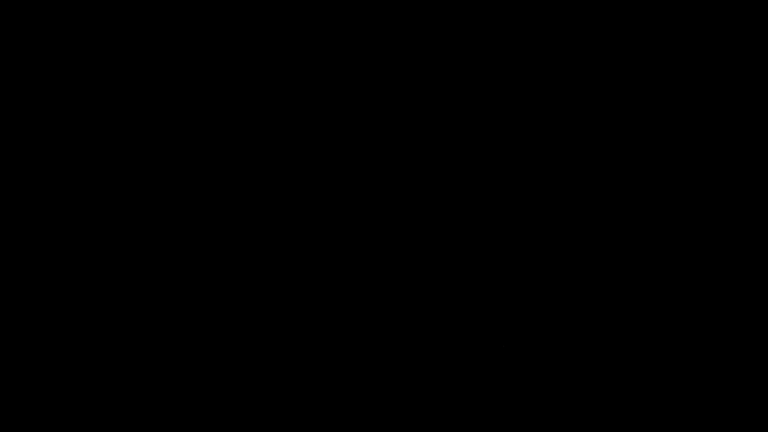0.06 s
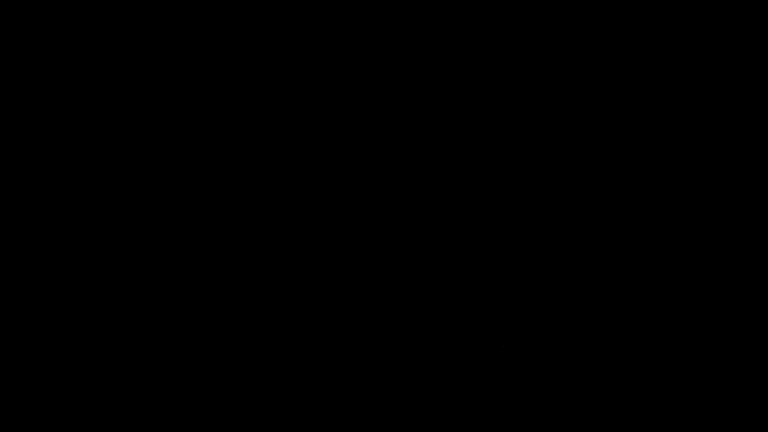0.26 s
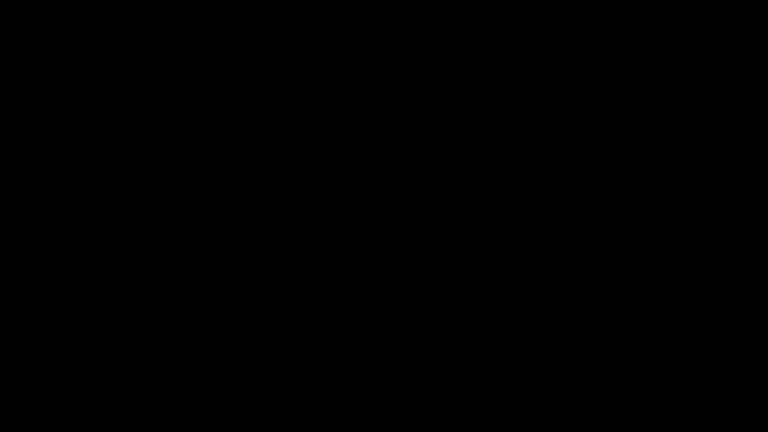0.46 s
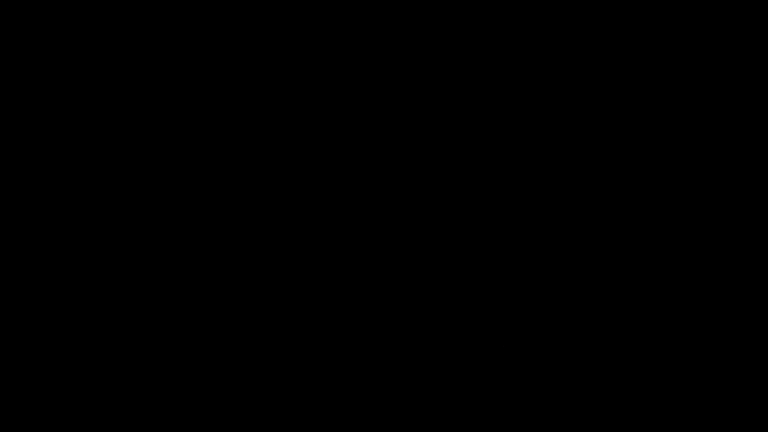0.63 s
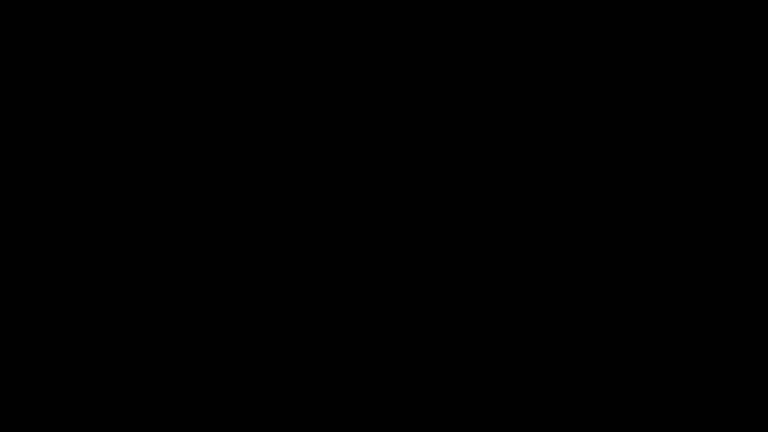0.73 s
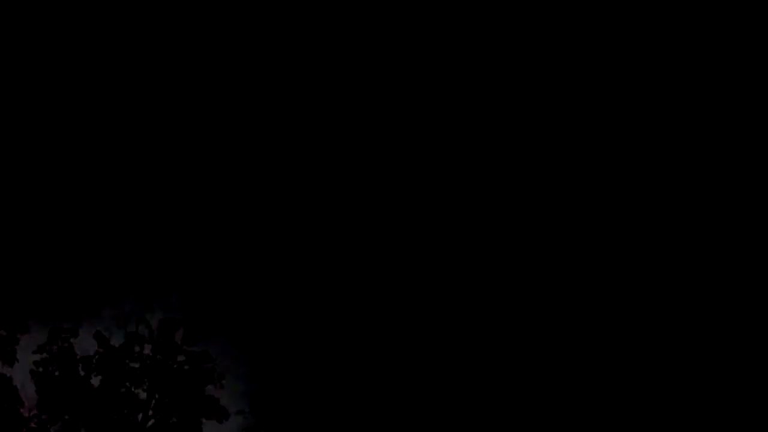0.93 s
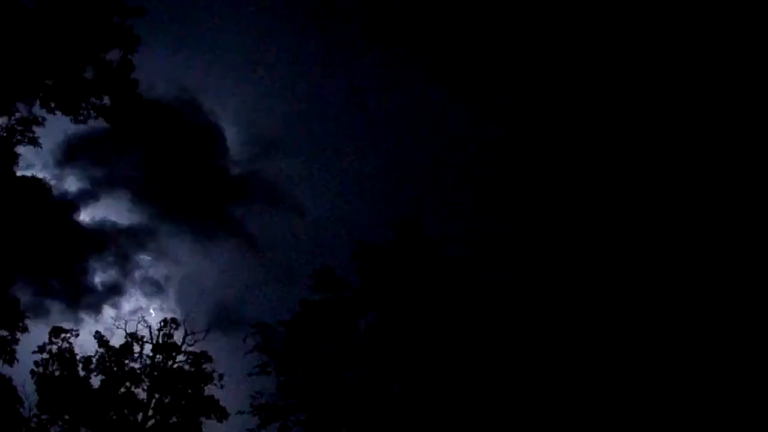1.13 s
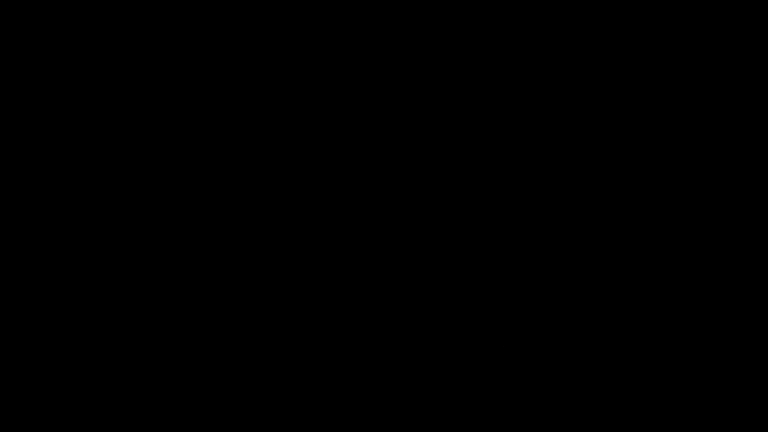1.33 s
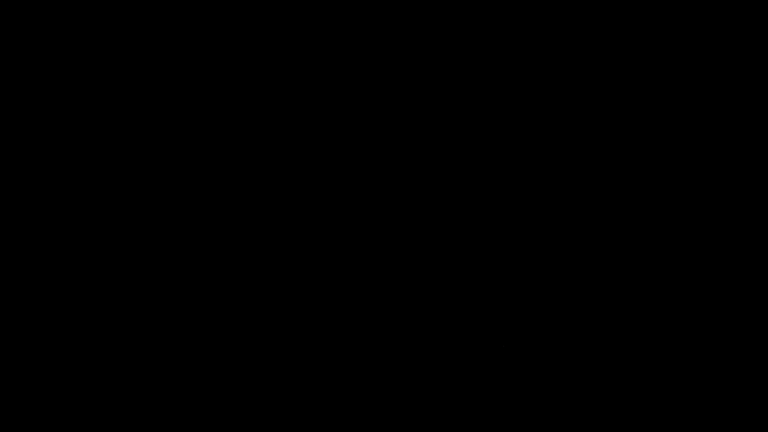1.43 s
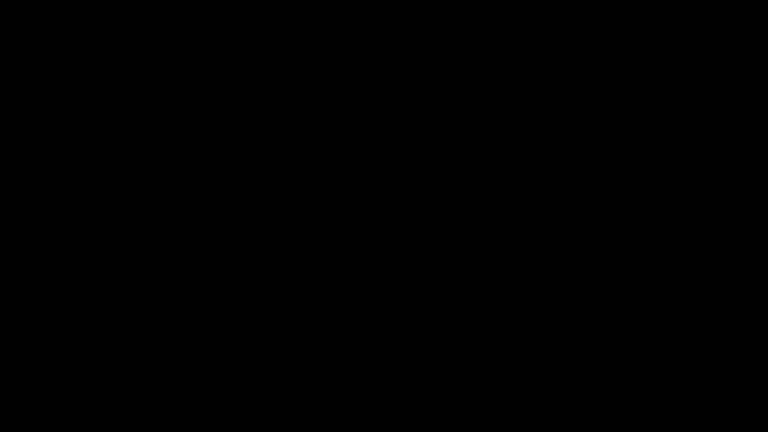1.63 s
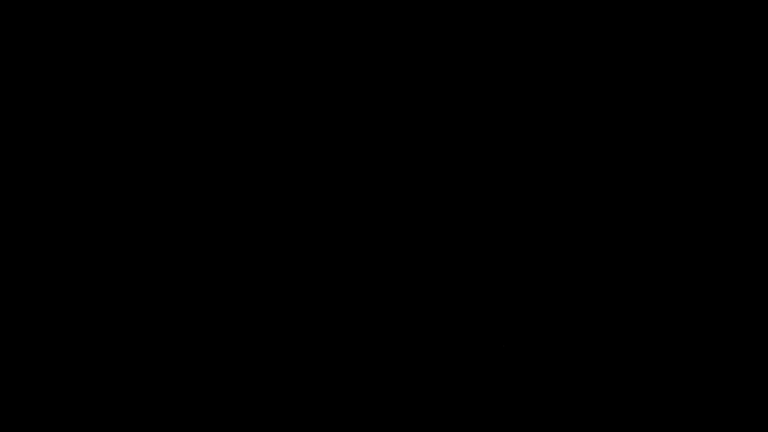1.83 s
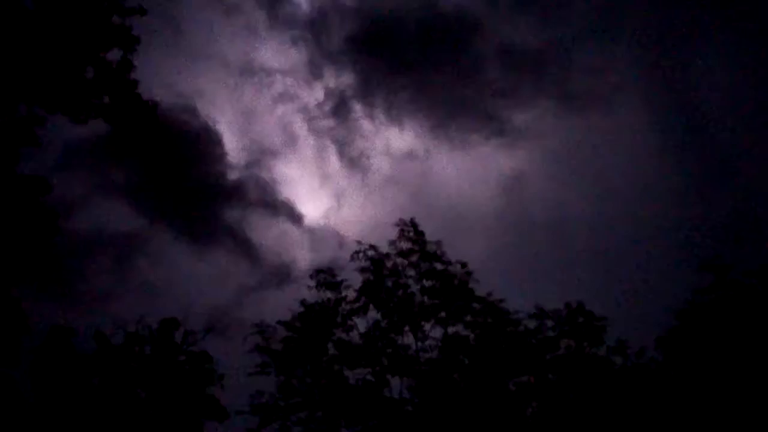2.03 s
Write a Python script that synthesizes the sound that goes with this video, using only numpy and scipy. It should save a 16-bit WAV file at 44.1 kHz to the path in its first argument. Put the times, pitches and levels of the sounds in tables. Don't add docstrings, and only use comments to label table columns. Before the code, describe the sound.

Low distant thunder rolls and swells twice, then fades under a fine hiss of rain

```python
import sys
import numpy as np
from scipy import signal
from scipy.fft import rfft, irfft
from scipy.io import wavfile

SR = 44100
rng = np.random.default_rng(int(sys.argv[2]) if len(sys.argv) > 2 else 0)


def gain_from_db(level_db):
    decades = np.asarray(level_db, float) / 20
    return 10 ** decades


def unload_audio(sound):
    columns = np.transpose(np.atleast_2d(sound))
    steps = np.round(np.clip(columns, -1, 1) * 32767)
    wavfile.write(sys.argv[1], SR, steps.astype(np.int16))


N = 91904


def rms_one(x):
    return x / np.sqrt(np.mean(x ** 2) + 1e-20)


def cut(x, hz, kind, order=2):
    return signal.sosfilt(signal.butter(order, hz, kind, fs=SR, output="sos"), x)


def drift(rate_hz):
    r = np.exp(-80 * np.pi * rate_hz / SR)
    noise = rng.standard_normal(N // 40 + 2002)
    slow = signal.lfilter([1], [1, -2 * r, r * r], noise)[2000:]
    return np.interp(np.arange(N) / 40, np.arange(len(slow)), rms_one(slow))


def resonate(x, body):
    out = 0
    for k, (hz, width_hz, db) in enumerate(body):
        r = np.exp(-np.pi * width_hz / SR)
        poles = [1, -2 * r * np.cos(2 * np.pi * hz / SR), r * r]
        out = out + (-1) ** k * gain_from_db(db) * signal.lfilter([1 - r * r, 0, r * r - 1], poles, x)
    return out


def clicks(per_s, spread_db):
    size = gain_from_db(spread_db * np.minimum(rng.exponential(1, N), 5))
    sign = rng.choice([-1, 1], N)
    return size * sign * (rng.random(N) < per_s / SR) + 1e-18


def colour(x, bright_db=0):
    # (frequency [Hz], density [dB per Hz])
    rain_spectrum = [(40, 1), (120, -9), (400, 4), (700, -4.5), (1200, -8), (2300, -15), (3300, -21),
                     (9000, -23)]
    # (frequency [Hz], gain [dB])
    mic_response = [(3300, 1.5), (3800, -4.5), (4200, -11), (4700, -3.5), (5400, 3), (6800, 6.5), (8300, 0),
                    (9800, -21.5)]
    hz = np.maximum(np.arange(len(x) // 2 + 1) * SR / len(x), 10)
    db = bright_db * (hz > mic_response[2][0])
    for curve in (rain_spectrum, mic_response):
        curve_hz, curve_db = np.transpose(curve)
        db = db + np.interp(np.log(hz), np.log(curve_hz), curve_db)
    db = db - 600 * np.clip(hz / mic_response[-1][0] - 1, 0, 0.2)
    return irfft(rfft(x) * gain_from_db(db), len(x))


def roll():
    # (time [s], roll level [dB], deep far weight [dB], bright near weight [dB])
    roll_course = [(0.0, -52.5, -2.5, -1.5), (0.12, -53, -0.5, -2.5), (0.3, -53.5, -3, -4),
                   (0.45, -49, -7, -2), (0.53, -48, -1, -7.5), (0.59, -47.5, 0.5, -4),
                   (0.66, -43.5, -3, -6.5), (0.76, -45, -0.5, -7.5), (0.81, -51.5, -0.5, -2),
                   (0.95, -48.5, -9.5, -4), (1.13, -48, -5, 1.5), (1.22, -46, -6.5, -3),
                   (1.29, -45.5, -4, -1.5), (1.43, -46, -3.5, 0), (1.47, -51, 0, -2), (1.64, -47, -6.5, -5),
                   (1.8, -56, -3, -2), (2.08, -64.5, 2.5, 0)]
    # (frequency [Hz], width [Hz], level [dB])
    near_body = [(159, 76, -1.5), (230, 72, 1)]
    deep_body = [(80, 28, 0), (121, 22, 2)]
    bright_body = [(300.7, 67.4, 0), (391.7, 121, -1.5), (463.5, 164, -6)]
    arrivals_per_s, arrival_spread_db = 2500, 1.5
    air_cut_hz, lump_db, lumps_per_s = 546, 1.5, 6.7
    s, db, deep_db, bright_db = np.transpose(roll_course)
    t, out = np.arange(N) / SR, 0
    for body, weight_db in ((near_body, 0 * db), (deep_body, deep_db), (bright_body, bright_db)):
        arrivals = resonate(clicks(arrivals_per_s, arrival_spread_db), body)
        rumble = rms_one(cut(arrivals, air_cut_hz, "low", order=3))
        level_db = np.interp(t, s, db + weight_db) + lump_db * drift(lumps_per_s)
        out = out + rumble * gain_from_db(level_db)
    return out


def shocks():
    # (time [s], peak level [dB], pitch [Hz])
    shock_packets = [(.02, -45.5, 204), (.072, -48, 175), (.106, -39.5, 217), (.112, -42.5, 136),
                     (.12, -44, 280), (.136, -42, 224), (.148, -41.5, 131), (0.191, -43, 161),
                     (.243, -45, 199.5), (0.45, -42.5, 217), (0.484, -42, 199), (.541, -36, 119),
                     (0.544, -44, 318), (.565, -34, 215), (.619, -34, 146), (.619, -36.5, 300),
                     (0.631, -43.5, 180), (.655, -37.5, 207), (0.655, -35.5, 95.5), (.672, -42, 302),
                     (0.674, -36.5, 165), (0.705, -37.5, 191.5), (0.731, -34.5, 91), (.734, -40.5, 313),
                     (0.749, -42.5, 197), (0.757, -44.5, 90), (.854, -40.5, 180), (0.883, -44.5, 330),
                     (0.892, -43, 183), (.922, -43, 150), (.97, -37.5, 215), (.982, -37, 170),
                     (1.004, -42, 227), (1.028, -38.5, 178), (1.034, -43.5, 108), (1.038, -44, 310),
                     (1.064, -44.5, 182), (1.065, -44, 97), (1.096, -39, 236), (1.097, -49, 143),
                     (1.168, -40.5, 366), (1.177, -35, 223), (1.211, -42, 317), (1.226, -43, 168),
                     (1.261, -43.5, 199), (1.284, -34, 174), (1.301, -42.5, 413), (1.304, -38, 235),
                     (1.326, -44, 124), (1.335, -44.5, 376), (1.357, -38.5, 324), (1.399, -35, 168.5),
                     (1.415, -35.5, 286), (1.425, -44.5, 383), (1.441, -37, 187), (1.495, -43, 193),
                     (1.516, -46, 173), (1.606, -39.5, 252), (1.633, -41.5, 184), (1.692, -42.5, 278)]
    base_s, cycles = 0.027, 1
    t, out = np.arange(N) / SR, 0
    for s, db, hz in shock_packets:
        swell = np.exp(-(2.8 * (t - s) / (base_s + cycles / hz)) ** 2)
        out = out + gain_from_db(db) * np.sin(2 * np.pi * hz * (t - s)) * swell
    return out


def drops():
    # (time [s], peak level [dB], brightness [dB], t60 [s])
    splats = [
        (.321, -48, -8, .04),
        (.3513, -39, -3, .16),
        (.474, -44, -12, .08),
        (.781, -51, -6, .05),
        (1.44, -46, -14, .05),
        (1.625, -39.5, -3, .13),
        (2.052, -46, -8, .05),
    ]
    hold_s, splat_top_hz, spray_low_hz, spray_share = 0.014, 3700, 4700, 1
    out, t = np.zeros(N + SR), np.arange(8192) / SR - 0.02
    rise = np.clip(t / 0.0015, 0, 1)
    crack = gain_from_db(-60 * t / 0.081)
    noise = rng.standard_normal((len(splats), len(t)))
    for (s, db, bright_db, t60_s), row in zip(splats, noise):
        fade_s = max(t60_s, 0.03)
        dull = cut(row, splat_top_hz, "low", order=4)
        splat = dull * (gain_from_db(-60 * np.maximum(t - hold_s, 0) / fade_s) + 0.6 * crack)
        bright = cut(row, spray_low_hz, "high", order=4)
        spray = bright * (spray_share * gain_from_db(-60 * t / fade_s) + crack)
        level = np.std(cut(colour(row, bright_db), 500, "high"))
        hit = cut(colour(rise * (splat + spray), bright_db), 500, "high")
        i = int((s + t[0]) * SR)
        out[i:i + len(t)] += gain_from_db(db - 13) * hit / level
    return out[:N]


def ticks():
    # (time [s], dull tap level [dB], bright tick level [dB])
    droplets = [(.0025, -62, -57), (.3518, -47, -50), (.3528, -41, -56), (.3545, -48, -45),
                (.3585, -47, -54), (.361, -45, -50), (.3645, -48, -58), (.3685, -48, -62),
                (.3735, -45, -64), (.382, -48, -64), (.4748, -47, -66), (.4785, -49, -66),
                (.4818, -43, -66), (.5185, -48, -66), (.607, -66, -54), (.6135, -66, -55),
                (.6265, -66, -55), (.6475, -66, -58), (.6555, -66, -58), (.7825, -50, -60),
                (1.0095, -66, -59), (1.4405, -49, -68), (1.4445, -44, -68), (1.4495, -46, -68),
                (1.5265, -66, -57), (1.5875, -66, -57), (1.6253, -41, -46), (1.629, -44, -52),
                (1.6325, -45, -56), (1.637, -49, -62), (1.641, -50, -64), (1.9835, -66, -54),
                (1.987, -66, -57), (1.9955, -66, -53), (2.0005, -66, -55), (2.0045, -66, -57),
                (2.0205, -66, -55), (2.0555, -49, -64)]
    # (frequency [Hz], width [Hz], level [dB])
    tap_body = [(760, 420, -4), (1400, 450, -7), (2300, 600, -15)]
    tick_body = [(5830, 400, -1.5), (6760, 360, -0.5), (8100, 550, -8)]
    tap_top_hz, tick_low_hz, tick_top_hz = 2600, 5100, 8600
    s, tap_db, tick_db = np.transpose(droplets)
    luck, rung = rng.standard_normal((len(s), 12)), [0, 0]
    for j, (body, db) in enumerate(((tap_body, tap_db), (tick_body, tick_db))):
        for k, part in enumerate(body):
            strength = gain_from_db(db + 2 * luck[:, 6 * j + k])
            sign = np.sign(luck[:, 6 * j + k + 3])
            hits = np.full(N, 1e-18)
            hits[(s * SR).astype(int)] = strength * sign * SR / (4 * np.pi * part[1])
            rung[j] = rung[j] + resonate(hits, [part])
    taps = cut(rung[0], tap_top_hz, "low", order=6)
    bright = cut(rung[1], tick_low_hz, "high", order=6)
    return taps + cut(bright, tick_top_hz, "low", order=10)


def spatters():
    # (time [s], peak level [dB], length [s])
    runs = [
        (0.598, -62.5, 0.06),
        (0.996, -67, 0.046),
        (1.101, -65.5, 0.032),
        (1.504, -68, 0.039),
        (1.978, -64, 0.041),
    ]
    t, gate = np.arange(N) / SR, 0
    for s, db, length_s in runs:
        ramps = np.minimum((t - s) / 0.0017, (s + length_s - t) / 0.0057)
        gate = gate + gain_from_db(db) * np.clip(ramps, 0, 1)
    ringing = resonate(clicks(1100, 1.4), [(7400, 230, 0.5), (6000, 740, 1), (8800, 1100, -6.0)])
    band = cut(cut(ringing, 5200, "high", order=4), 8400, "low", order=6)
    return gate * rms_one(band) * gain_from_db(-5.5)


def trill():
    # (frequency [Hz], level [dB])
    wing_tones = [(7300, 0), (8600, -7), (7900, -8)]
    start_s, gap_s, pulse_s, level_db = 0.4565, 0.0116, 0.004, -62.5
    t, gate = np.arange(N) / SR, 0
    for k, db in enumerate([-1, -1, 1.5, -5, 0]):
        gate = gate + gain_from_db(db) * np.exp(-((t - start_s - k * gap_s) / pulse_s * 2) ** 2)
    hoarse = 1 + 0.4 * rms_one(cut(rng.standard_normal(N), 500, "low"))
    tone = sum(gain_from_db(db) * np.sin(2 * np.pi * hz * t) for hz, db in wing_tones)
    return gain_from_db(level_db) * gate * hoarse * tone


def rain():
    level_db, patchy_db, patches_per_s = -54.5, 0.86, 2.9
    white = rng.standard_normal(N)
    low = cut(white, 3100, "low", order=1)
    low_patches = gain_from_db(patchy_db * drift(patches_per_s))
    high_patches = gain_from_db(patchy_db * drift(patches_per_s))
    return gain_from_db(level_db) * rms_one(colour(low * low_patches + (white - low) * high_patches))


def scene():
    thunder = roll() + shocks()
    nearby = drops() + ticks() + spatters() + trill()
    return (thunder + nearby + rain())[None]


def low_pass(x):
    return signal.sosfilt(signal.butter(12, 15720, fs=SR, output="sos"), x)


def record(dry):
    # (frequency [Hz], rms level [dB])
    whines = [(7828, -89), (8172, -90.5), (11025, -118), (12403, -119), (13781, -117), (15159, -120)]
    rumble_cut_hz, self_noise_db, low_noise_db = 68, -91, -74.5
    t = np.arange(N) / SR
    x = cut(dry, rumble_cut_hz, "high", order=3)
    x = x + sum(gain_from_db(db + 3) * np.sin(2 * np.pi * hz * t) for hz, db in whines)
    hiss = gain_from_db(self_noise_db) * rng.standard_normal(N)
    low_noise = rms_one(cut(cut(rng.standard_normal(N), 60, "low"), 33, "high"))
    return low_pass(x + hiss + gain_from_db(low_noise_db) * low_noise)


dry = scene()
out = record(dry)
unload_audio(out)
```